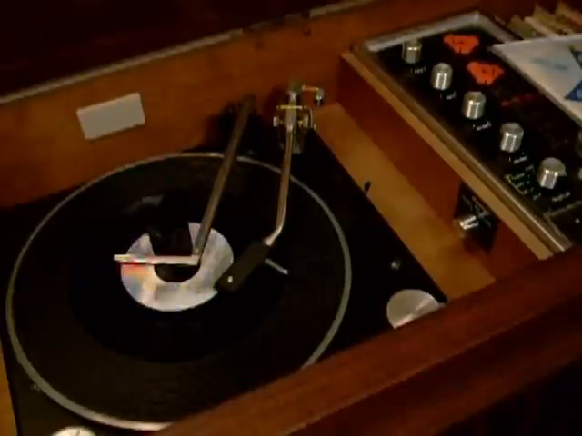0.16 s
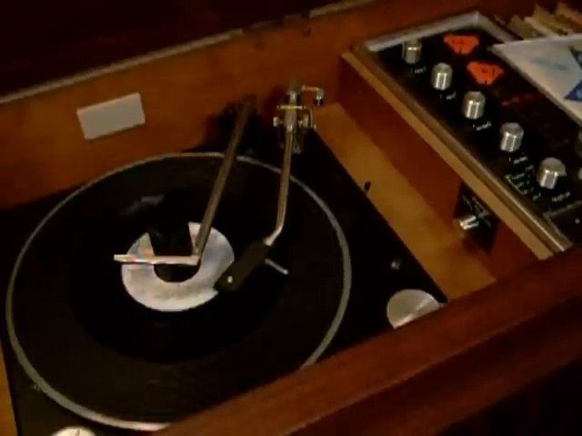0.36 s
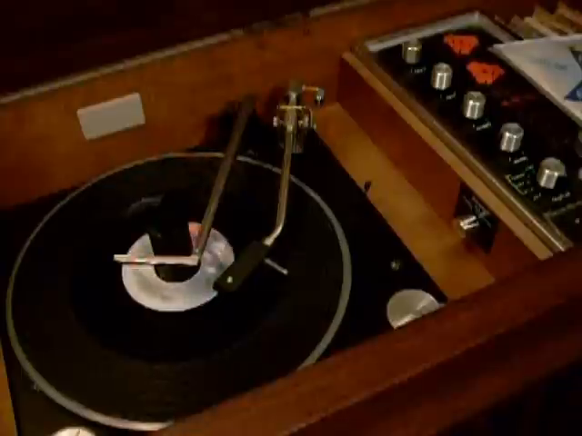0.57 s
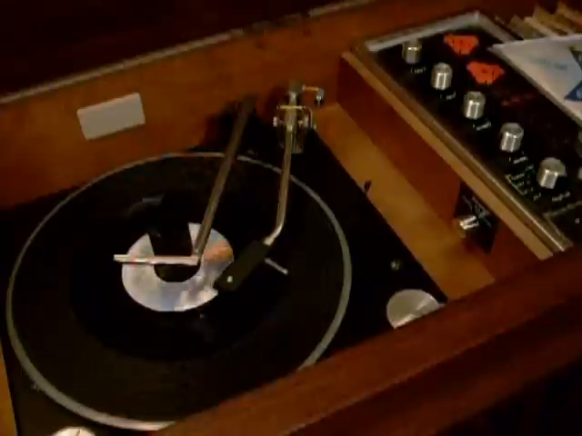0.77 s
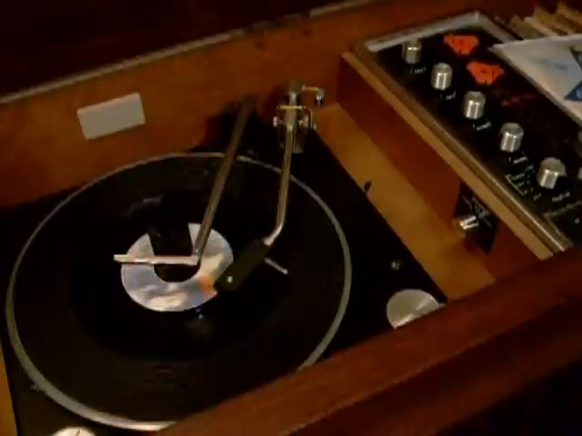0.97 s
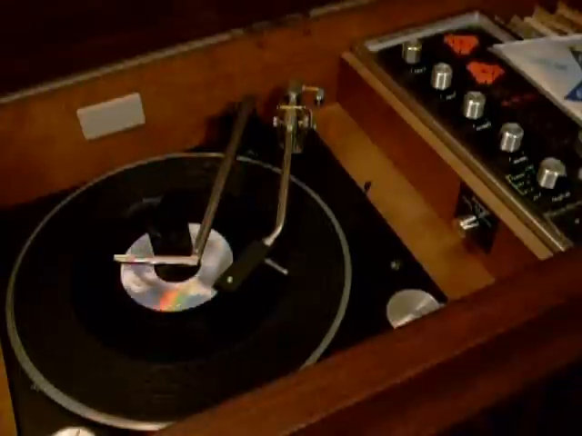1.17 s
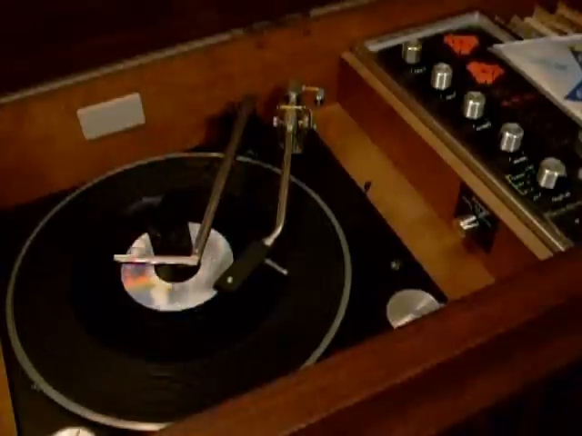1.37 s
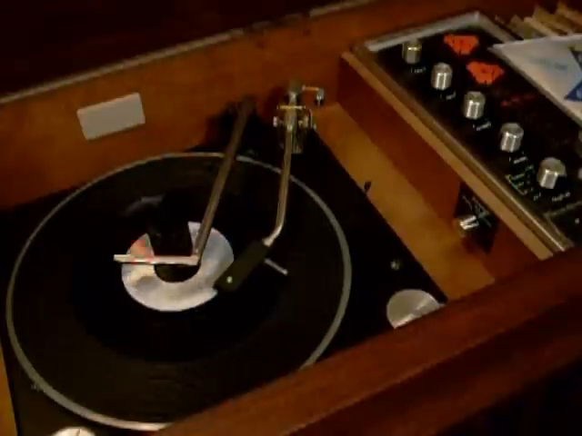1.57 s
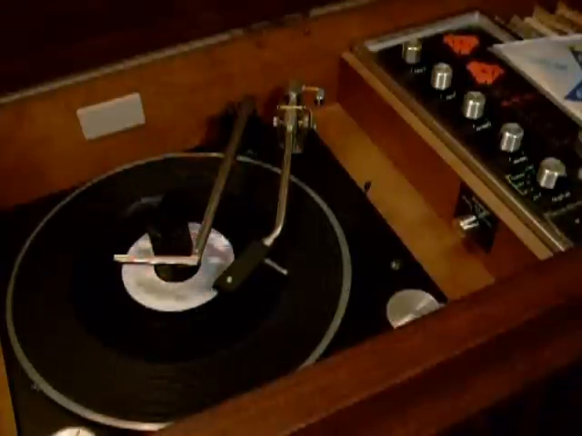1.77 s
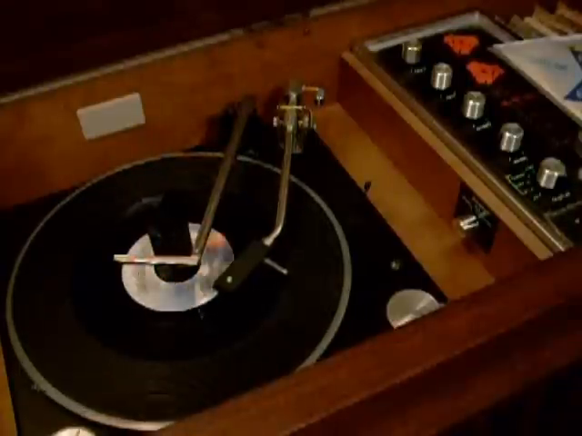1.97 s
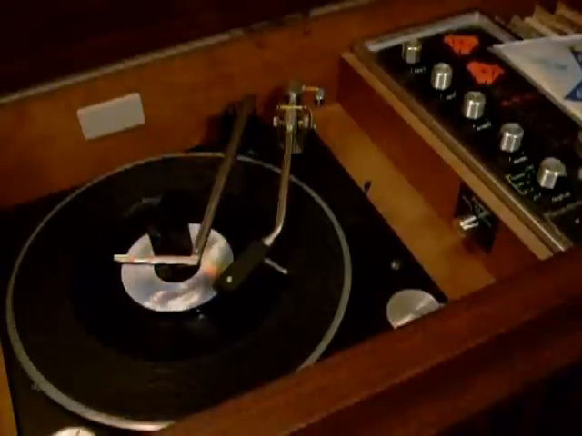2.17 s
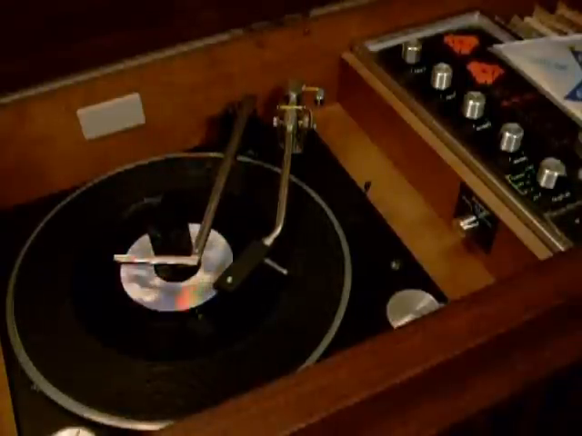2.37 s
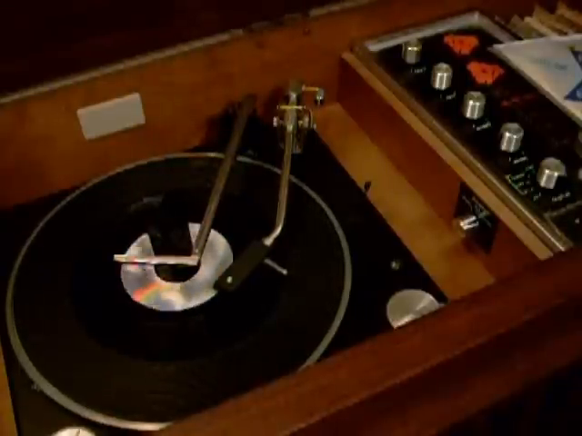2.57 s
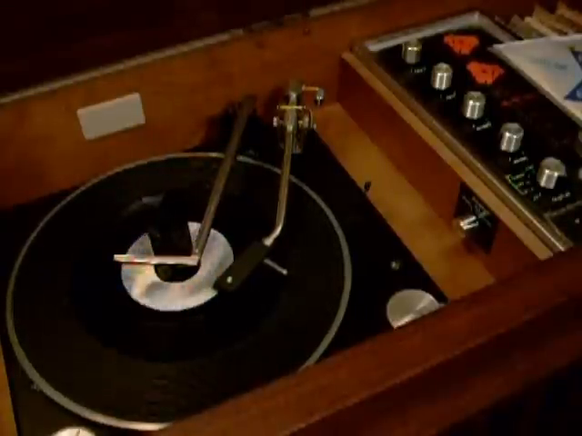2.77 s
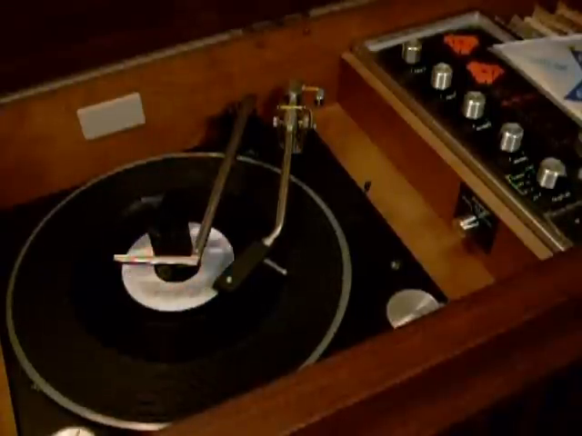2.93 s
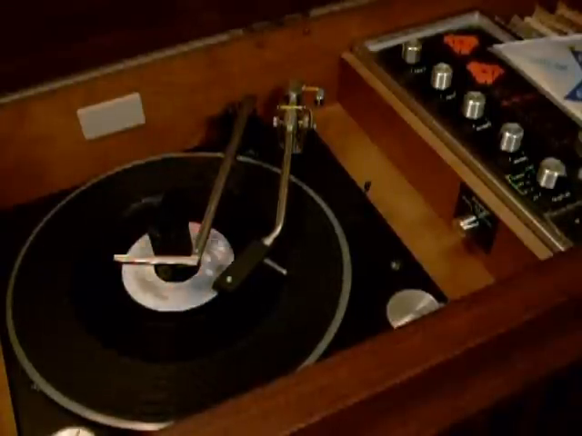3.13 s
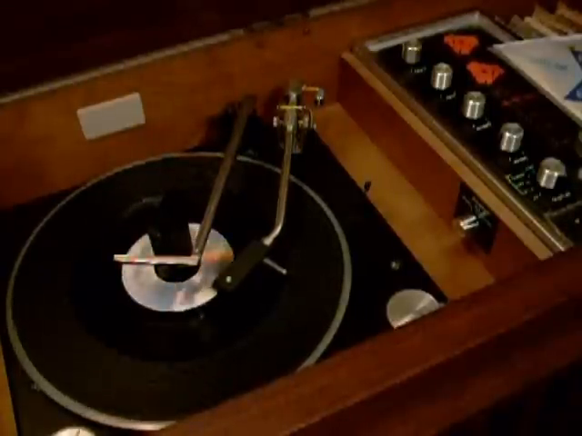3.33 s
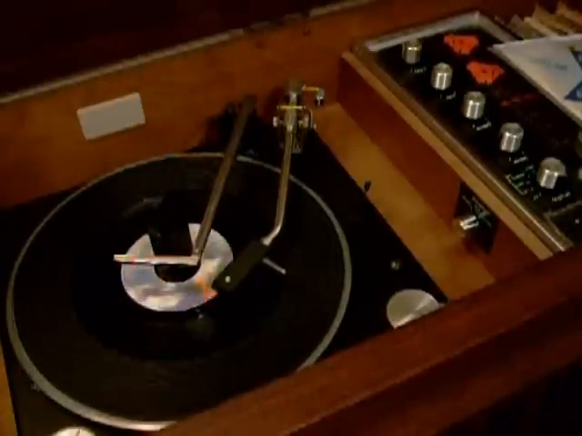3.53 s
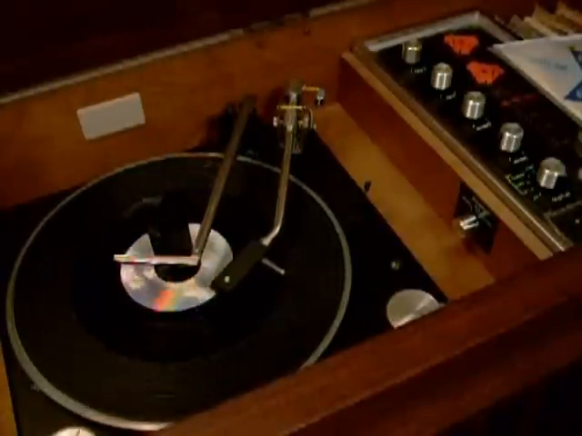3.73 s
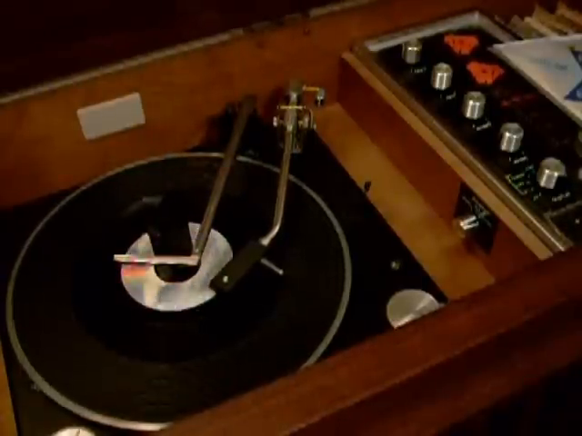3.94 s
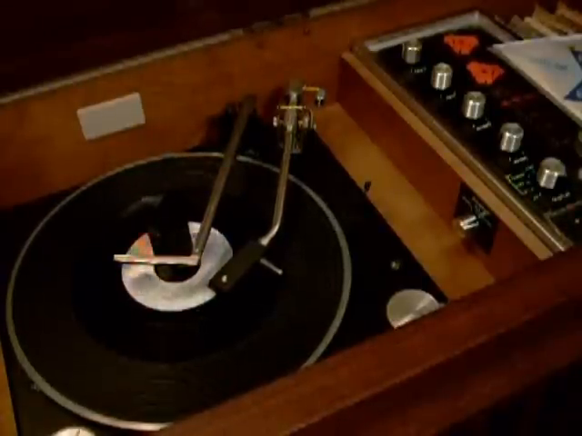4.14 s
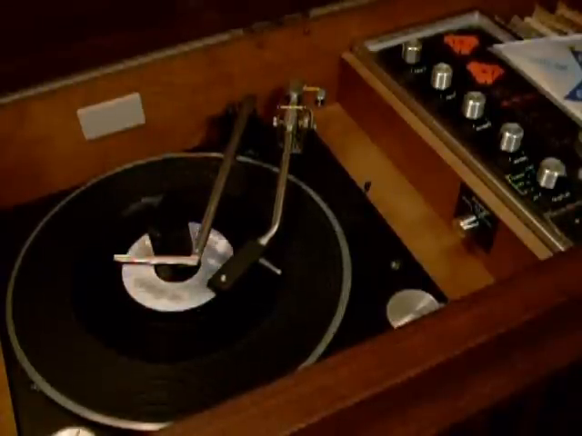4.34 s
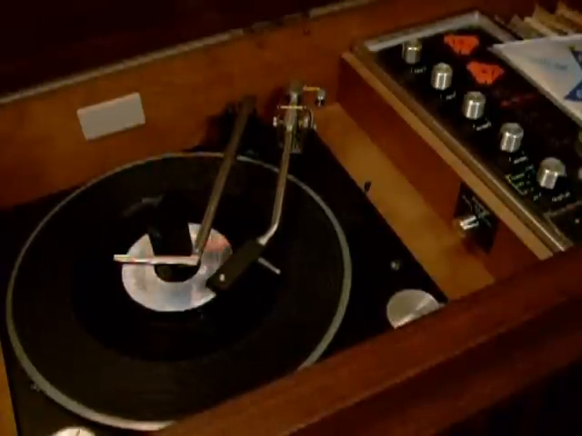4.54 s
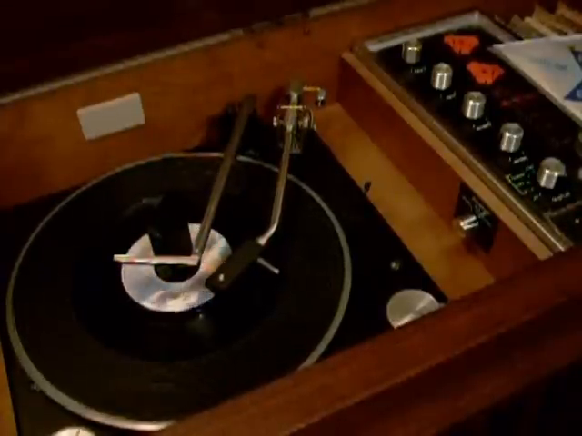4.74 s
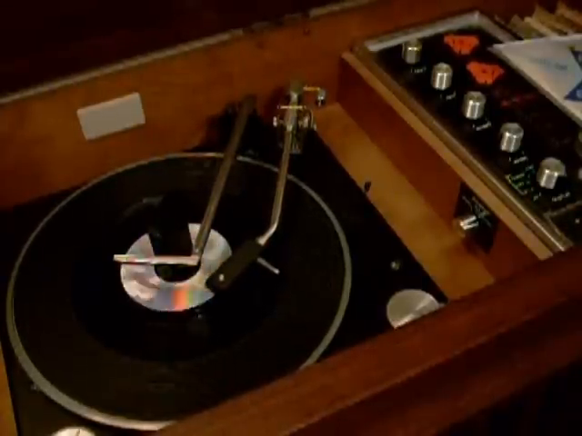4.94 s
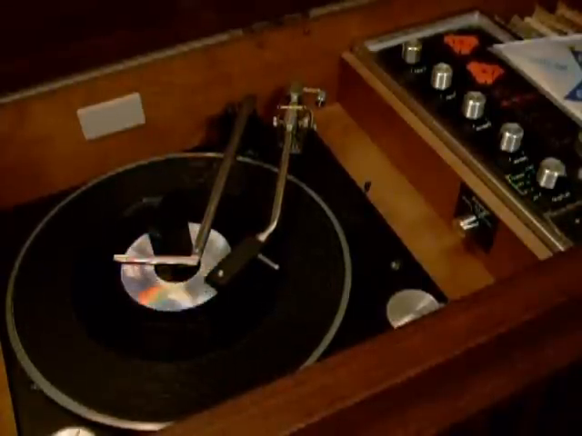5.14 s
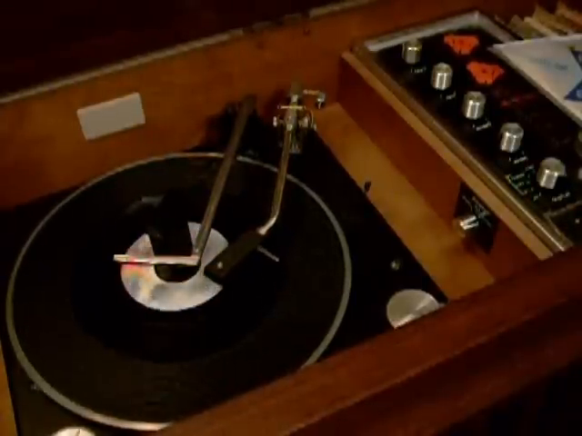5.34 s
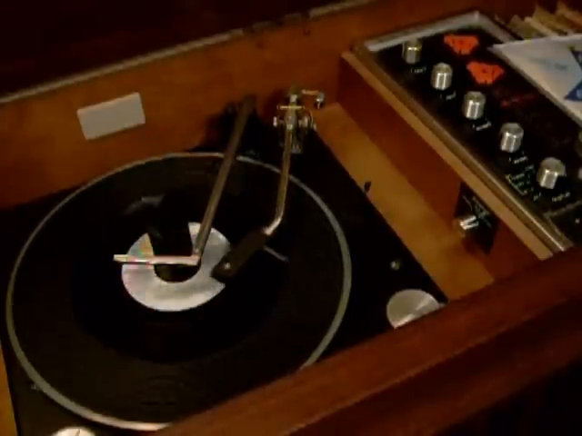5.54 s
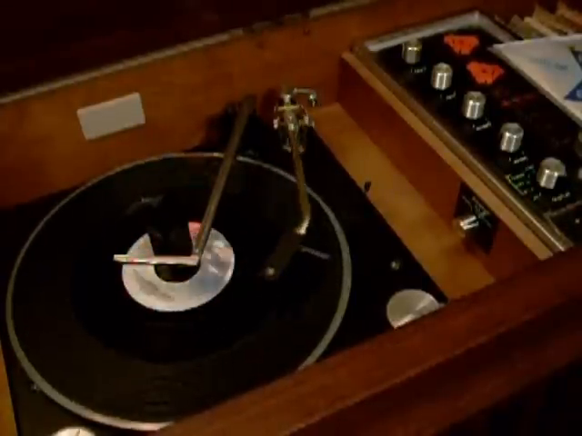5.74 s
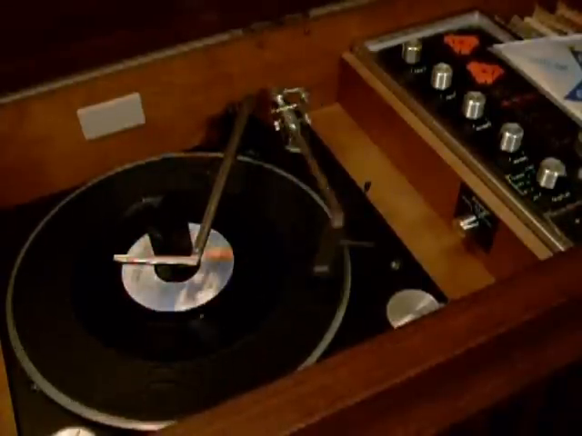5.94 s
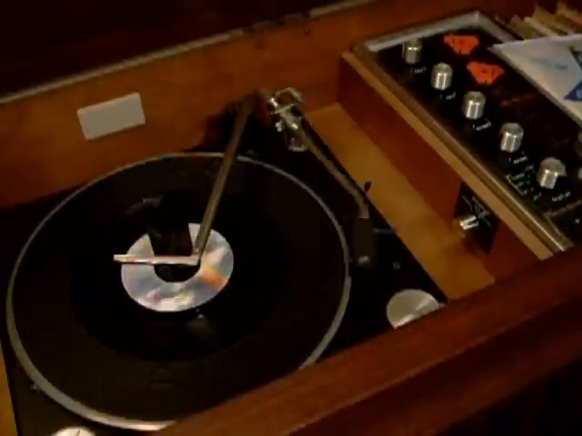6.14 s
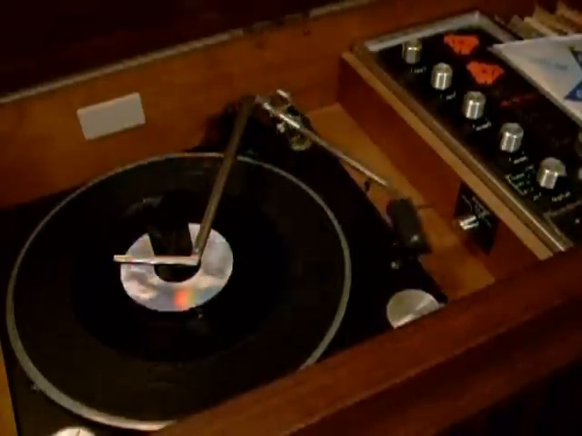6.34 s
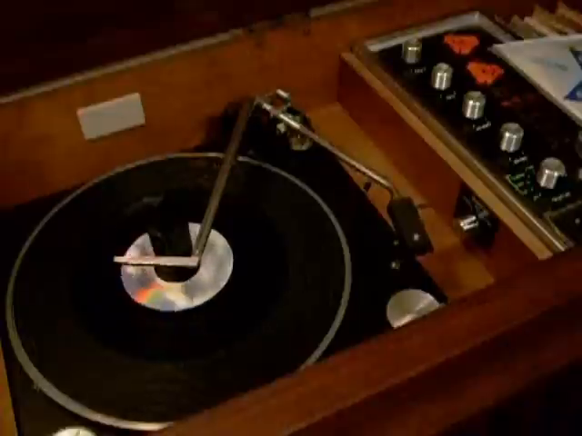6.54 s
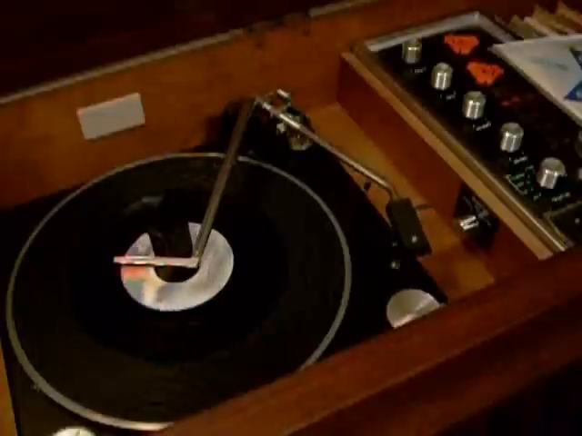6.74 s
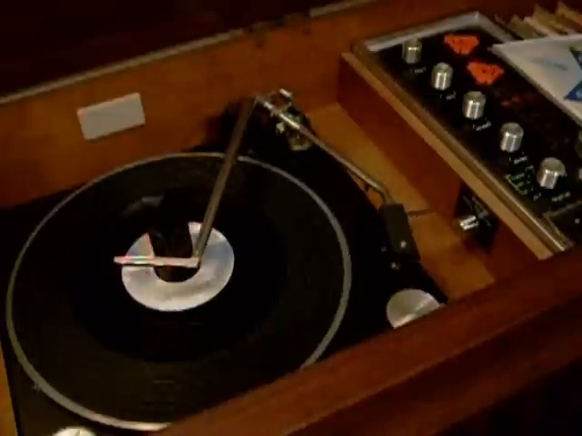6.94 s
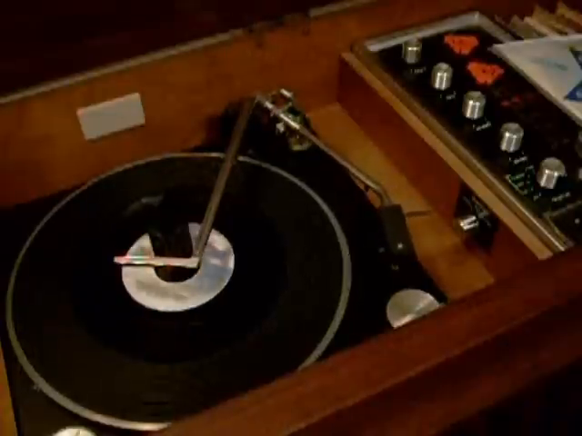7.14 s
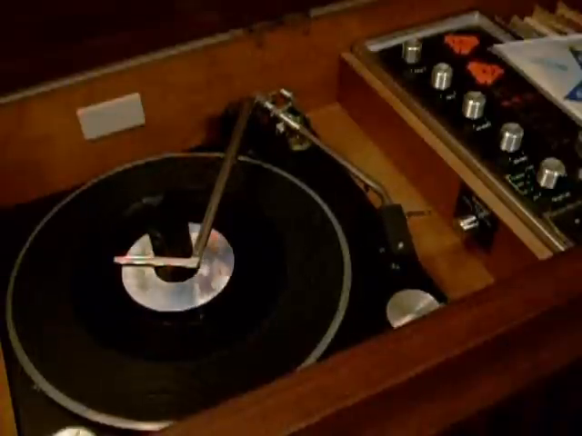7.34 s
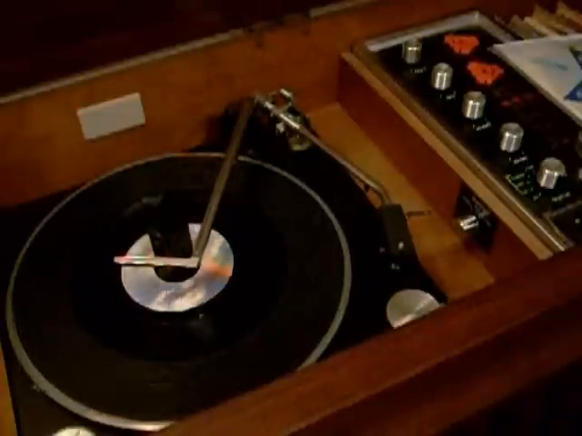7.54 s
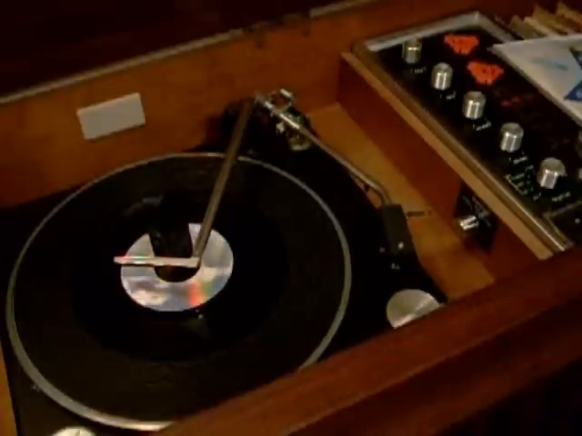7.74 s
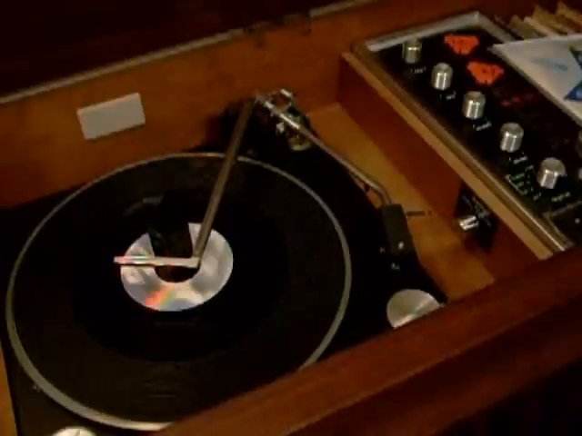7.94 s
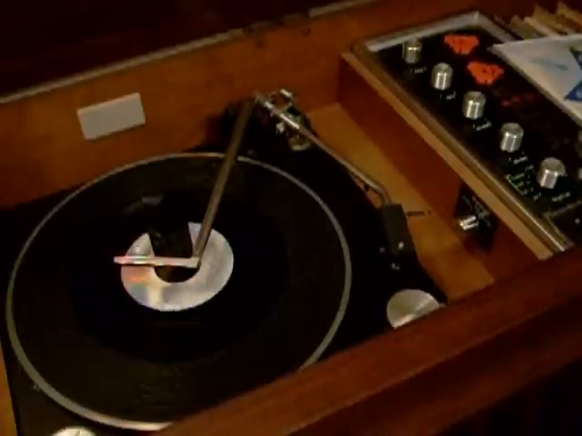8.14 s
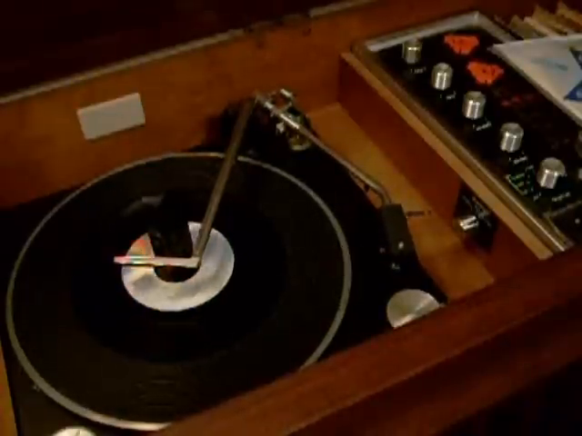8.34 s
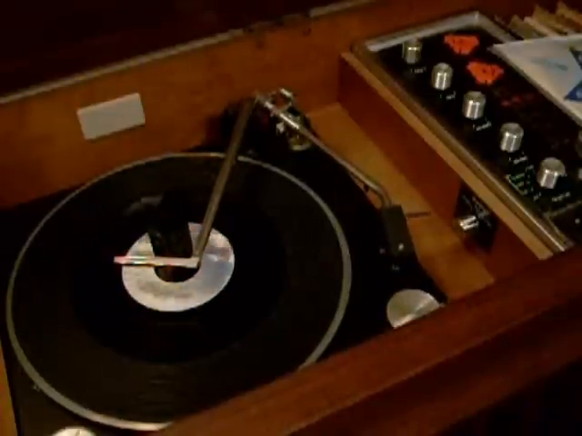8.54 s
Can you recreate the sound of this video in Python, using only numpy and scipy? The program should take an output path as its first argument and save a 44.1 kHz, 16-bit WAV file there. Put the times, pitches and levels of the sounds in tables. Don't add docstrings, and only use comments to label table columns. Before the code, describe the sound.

Vinyl hiss, motor hum and deep rumble build to a loud click and sharp pop, followed by small mechanical ticks and a wooden-metallic clatter, then hiss.

```python
import sys
import numpy as np
from scipy import signal
from scipy.fft import rfft, irfft
from scipy.io import wavfile
from scipy.ndimage import uniform_filter1d

SR = 44100
rng = np.random.default_rng(int(sys.argv[2]) if len(sys.argv) > 2 else 0)


def voltage_ratio(level):
    return 10 ** (np.asarray(level, float) / 20)


def output_pcm(signal):
    pcm = np.clip(np.atleast_2d(signal).T, -1, 1) * 32767
    wavfile.write(sys.argv[1], SR, np.round(pcm).astype(np.int16))


N = 379348

# (time [s], arm pitch [Hz], rise of the boom [dB])
ARM_PULL = [(2.75, 54.8, 1.5), (3.25, 45.1, 7.5), (3.6, 38.5, 10.5), (3.77, 44.78, 11.5), (4.15, 35.7, 13),
            (4.4, 35.54, 15.5), (4.55, 31.43, 19), (4.88, 33.3, 8.5), (5.0, 33.6, -3)]
# (time [s], swell or dip of the boom [dB])
LURCHES = [(0.05, 5), (0.53, 7), (0.85, -6), (1.3, 4), (1.93, 15), (2.08, -7), (2.47, 4), (2.58, -8),
           (2.84, 6.5), (2.97, 1.5), (3.33, 6.5), (3.37, -9), (3.74, -9), (3.83, 2), (3.93, -7), (4.02, 6),
           (4.29, -17), (4.48, 0.5), (4.64, 7), (4.93, 16.5), (5.04, -14), (6.36, 6), (6.78, 2), (6.93, 5),
           (7.78, 12), (8.25, 3), (8.41, 5)]
# (frequency [Hz], density [dB per Hz])
BOOM_SPECTRUM = [(20, -16), (30, 4), (45, 2.5), (60, -7), (90, -27.5), (130, -40.5)]
# (time [s], peak [dB], pitch [Hz], t60 [s])
THUMPS = [(1.63, -23, 39.3, 0.19), (1.9, -17, 45.4, 0.11), (4.446, -18.5, 171, 0.072),
          (4.453, -11.5, 90, 0.066), (4.44, -24, 120, 0.12), (4.468, -17, 54, 0.2), (4.46, -38, 700, 0.03),
          (4.456, -32.5, 303, 0.1), (4.457, -33, 521, 0.023), (4.56, -27, 98, 0.047),
          (4.91, -8.5, 48, 0.13), (4.917, -26.5, 205, 0.025), (4.568, -28, 198, 0.032),
          (6.105, -24.5, 700, 0.05), (6.105, -27.5, 172, 0.036), (6.105, -34, 477, 0.041),
          (6.2, -29, 574, 0.033)]
# (time [s], level [dB], top [Hz], t60 [s])
SHUDDERS = [
    (4.449, -27, 460, 0.2),
    (4.555, -32, 296, 0.15),
    (4.915, -35, 498, 0.1),
]
# (time [s], peak [dB], favoured low mode [Hz], middle modes [dB], upper modes [dB])
CAM_TICKS = [(4.918, -38, 490, -15, -21), (4.937, -38.5, 800, -3, -11), (4.962, -36, 666, -15, -13),
             (5.347, -35, 852, -8, -9), (5.474, -35, 696, -6.5, -19), (5.611, -37, 480, -12, -17),
             (5.726, -33.5, 1103, -1.5, -2.5), (5.812, -37.5, 670, -8, -5), (5.822, -33.5, 675, -7.5, -3),
             (5.916, -46, 552, -12, -13), (6.662, -41, 640, -11, -16), (6.719, -46, 692, -12, -16),
             (6.774, -34, 730, -5, -4), (6.798, -38.5, 1060, -4, -2), (6.899, -39, 690, -15, -15)]
# (time [s], peak [dB], favoured low mode [Hz], middle modes [dB], upper modes [dB])
REST_CLATTER = [(5.992, -28.5, 816, -6, -7), (6.011, -43, 870, -12, -10), (6.062, -38, 650, -12, 0.1),
                (6.074, -25, 930, -5.5, -6.5), (6.106, -19.5, 477, -8, -6.5), (6.123, -29.5, 525, -6, -23),
                (6.152, -37, 630, -8, -5), (6.164, -32.5, 441, -5, -4), (6.171, -29.5, 1040, -10, -6),
                (6.194, -23.5, 870, -1.5, -8), (6.222, -28, 653, -4, 0.5), (6.234, -32.5, 965, -6, -10),
                (6.258, -35, 650, -12, -7.5), (6.271, -36, 1050, -14, -24), (6.306, -38.5, 780, -6.5, -7),
                (6.325, -42, 860, -14, -18)]
# (frequency [Hz], level [dB], t60 [s])
LOW_MODES = [(289, 1.5, 0.054), (380, -8, 0.11), (492, 2, 0.033), (555, 1, 0.033), (686, 3.5, 0.046),
             (817, -3, 0.069), (884, 1.5, 0.08), (1022, 2, 0.055), (1060, 0, 0.048), (1335, -25, 0.011)]
# (frequency [Hz], level [dB], t60 [s])
MIDDLE_MODES = [(1655, -6.5, 0.023), (1780, -1.5, 0.04), (1900, -2.5, 0.026), (1984, 1.5, 0.031),
                (2056, 1.5, 0.045), (2226, 1, 0.048)]
# (frequency [Hz], level [dB], t60 [s])
UPPER_MODES = [(2720, -20, 0.016), (3165, 2.5, 0.021), (3310, 1, 0.016), (3360, 4.5, 0.019),
               (3560, 0, 0.015), (3810, -4, 0.018), (4200, -3, 0.018), (3996, -1, 0.022)]
# (time [s], peak [dB], lowest pitch [Hz], highest pitch [Hz])
DUST_TICKS = [
    (3.14, -13, 1500, 12000),
    (4.4147, -6, 700, 8400),
    (4.4239, -10.5, 2500, 7480),
    (4.8085, -20.5, 3002, 11000),
    (6.1067, -6, 9600, 11000),
]
# (time [s], level [dB])
GROOVE_WEAR = [(0.0, -52.5), (1.25, -53), (1.65, -51), (1.95, -53.5), (2.45, -56), (3.35, -54.5),
               (3.55, -53), (4.75, -54.5), (5.1, -55.5), (6.65, -55.5), (7.4, -55), (7.75, -53.5),
               (8.6, -54)]
# (time [s], extra roughness [dB])
SCUFFS = [(0.03, 1.5), (0.3, 1), (0.6, 1.5), (0.92, 0.5), (1.62, 1), (1.85, 1.5), (2.72, 2), (3.88, 3),
          (4.8, 1), (5.21, 2.5), (6.4, 1.5), (7.7, 1.5), (8.04, 1)]
# (frequency [Hz], density [dB per Hz])
HISS_SPECTRUM = [(150, -27), (250, -3), (840, -6), (1700, -8.5), (5000, -13.5), (12500, -18),
                 (15500, -19.5)]
# (frequency [Hz], density [dB per Hz])
RUMBLE_SPECTRUM = [(32, -29), (55, 3.5), (97, -4), (156, -10.5), (280, -19), (500, -29), (650, -32.5),
                   (1100, -120)]
# (frequency [Hz], density [dB per Hz])
WARP_SPECTRUM = [(4, 4.5), (8, -3), (14, -3.5), (26, -6), (36, -39)]
# (multiple of the hum pitch [1], level [dB])
HUM_LINES = [(.5, -15), (1, 1.5), (2, -9.5), (3, -19)]
# (time [s], dip [dB])
HUM_GAPS = [
    (0.62, -7),
    (1.6, -8.5),
    (2.41, -2.5),
    (3.61, -8),
    (4.09, -15),
]

LURCH_S, SCUFF_S = 0.027, 0.044
POP_S, POP_DB, STEP_DB, BOUNCE_DB = 4.65154, -6, -8, -22


def rms_one(x):
    return x / np.sqrt(np.mean(x ** 2) + 1e-20)


def in_time(rows):
    s, *columns = np.transpose(rows)
    return [np.interp(np.arange(N) / SR, s, c) for c in columns]


def bumps(rows, width_s):
    t = np.arange(0, N, 20) / SR
    swells = sum(db * np.exp(-((t - s) / width_s) ** 2) for s, db in rows)
    return np.interp(np.arange(N) / SR, t, swells)


def drift(rate_hz):
    r = np.exp(-80 * np.pi * rate_hz / SR)
    slow = signal.lfilter([1], [1, -2 * r, r * r], rng.standard_normal(N // 40 + 2002))[2000:]
    return np.interp(np.arange(N) / 40, np.arange(len(slow)), rms_one(slow))


def coloured(spectrum, top_hz):
    hz = np.maximum(np.fft.rfftfreq(N, 1 / SR), 1)
    point_hz, point_db = np.transpose(spectrum)
    shape = voltage_ratio(np.interp(np.log(hz), np.log(point_hz), point_db)) * (hz < top_hz)
    return rms_one(irfft(rfft(rng.standard_normal(N)) * shape, N))


def evened(noise, size):
    return rms_one(noise / uniform_filter1d(noise ** 2, size=size) ** 0.35)


def ring(clicks, hz, t60):
    r, w = voltage_ratio(-60 / (t60 * SR)), 2 * np.pi * hz / SR
    return signal.lfilter([0, np.sin(w)], [1, -2 * r * np.cos(w), r * r], clicks + 1e-18)


def add(out, s, sound):
    start = round(s * SR)
    out[start:start + len(sound)] += sound


def roughness():
    return in_time(GROOVE_WEAR)[0] + bumps(SCUFFS, SCUFF_S)


def boom():
    t, rough_db = np.arange(N) / SR, roughness()
    arm_hz, pull_db = in_time(ARM_PULL)
    wander_db = 2.5 * drift(7.2) * np.interp(t, [3, 3.3, 5, 5.1], [1, 0.3, 0.3, 1])
    level_db = -34.5 + 0.1 * (rough_db - rough_db.mean()) + pull_db + bumps(LURCHES, LURCH_S) + wander_db
    broad = evened(coloured(BOOM_SPECTRUM, top_hz=240), size=4000)
    phase = 2 * np.pi * np.cumsum(arm_hz + 3 * drift(14.8)) / SR
    higher_mode = 0.38 * np.sin(1.3 * phase + 1.03 * drift(5.0))
    swing = np.sqrt(2) * (np.sin(phase) + higher_mode)
    share = np.interp(t, [3.1, 3.5, 4.85, 4.9], [0.014, 0.63, 0.64, 0.025])
    pop_dip = 1 - np.exp(-((t - POP_S) / 0.012) ** 2)
    return pop_dip * voltage_ratio(level_db - 1.36) * (np.sqrt(share) * swing + np.sqrt(1 - share) * broad)


def thumps():
    out = np.zeros(N)
    for s, db, hz, t60 in THUMPS:
        age = np.arange(round(2 * t60 * SR)) / SR
        swell = age * voltage_ratio(-90 * age / t60)
        add(out, s, -voltage_ratio(db) * swell / swell.max() * np.sin(2 * np.pi * hz * age))
    return out


def shudders():
    out, age = np.zeros(N), np.arange(16000) / SR
    for s, db, top_hz, t60 in SHUDDERS:
        band = signal.butter(4, [70, top_hz], "band", fs=SR, output="sos")
        noise = rms_one(signal.sosfilt(band, rng.standard_normal(len(age))))
        onset = 1 - np.exp(-age / 0.0076)
        add(out, s, voltage_ratio(db - 60 * age / t60) * onset * noise)
    return out


def struck_modes(modes, rattle):
    favoured_hz = modes[-1][0]
    body = 0
    for k, (hz, db, t60) in enumerate(modes):
        strength_db = db + rng.normal(0, 2.2) - 3.2 * abs(np.log2(hz / favoured_hz))
        body = body + voltage_ratio(strength_db) * rms_one(ring(rattle, hz, t60)) * (-1) ** k
    return body / np.abs(body).max()


def knocks():
    out, age = np.zeros(N), np.arange(6000) / SR
    for s, db, low_hz, middle_db, upper_db in [*CAM_TICKS, *REST_CLATTER]:
        middle_hz = np.interp(db, [-40, -20], [2220, 1988]) + 70 * rng.standard_normal()
        groups = (([*LOW_MODES, (low_hz, 3, 0.045)], 0),
                  ([*MIDDLE_MODES, (middle_hz, 3, 0.045)], middle_db),
                  (UPPER_MODES, upper_db))
        for modes, group_db in groups:
            sizes = rng.random(len(age))
            contacts = np.roll(sizes, 1) < 3000 / SR
            rattle = contacts * (sizes - 0.5) * 2 * np.exp(-age / 0.0032)
            rattle[0] = 0.87
            add(out, s, voltage_ratio(db + group_db) * struck_modes(modes, rattle))
    return signal.sosfilt(signal.butter(6, 4700, fs=SR, output="sos"), out)


def big_pop(out):
    age = np.arange(2000) / SR
    rise = np.clip(age / 0.00021, 0, 1) ** 2.2
    add(out, POP_S, -voltage_ratio(POP_DB) * rise * np.exp(-np.maximum(age - 2.2e-4, 0) / 1.6e-5))
    add(out, POP_S + 3.0e-4, -voltage_ratio(BOUNCE_DB) * np.exp(-age / 2e-5))
    jump = np.cos(2 * np.pi * 95 * age) * np.exp(-age / 0.0072) * rise
    fade = np.cos(np.linspace(0, np.pi / 2, len(age)))
    add(out, POP_S, -voltage_ratio(STEP_DB) * jump * fade)


def ticks():
    out, click = np.zeros(N), signal.unit_impulse(2000)
    for s, db, low_hz, high_hz in DUST_TICKS:
        edges_hz = [low_hz, np.clip(high_hz, 1.1 * low_hz, 18000)]
        band = signal.butter(3, edges_hz, "band", fs=SR, output="sos")
        add(out, s, voltage_ratio(db) * signal.sosfilt(band, click))
    big_pop(out)
    out = signal.lfilter(*signal.iirnotch(9000, 4.0, fs=SR), out)
    return signal.sosfilt(signal.cheby2(8, 50, 1.04 * 16500, fs=SR, output="sos"), out)


def warp():
    lurch_db = np.clip(bumps(LURCHES, 2 * LURCH_S), -9, 9)
    level_db = -31.5 + 2.5 * drift(4.9) + 0.31 * lurch_db
    return voltage_ratio(level_db + 0.46) * evened(coloured(WARP_SPECTRUM, top_hz=53), size=9000)


def rumble():
    rough_db = roughness()
    level_db = -42.5 + 0.79 * (rough_db - rough_db.mean()) + 0.8 * drift(4.2)
    level_db = level_db - 0.9 * (np.arange(N) / SR > 5)
    return voltage_ratio(level_db + 1.8 + drift(11)) * evened(coloured(RUMBLE_SPECTRUM, top_hz=1000), size=5000)


def hiss():
    flicker_db = 0.7 * drift(23) + 0.5 * drift(105)
    return voltage_ratio(roughness() + 5.5 + flicker_db) * coloured(HISS_SPECTRUM, top_hz=15560)


def hum():
    t = np.arange(N) / SR
    phase = 2 * np.pi * np.cumsum(120 + 0.367 * drift(2.54)) / SR
    sag_db = 5 * np.maximum(t - 3.3, 0)
    lines = 0
    for k, db in HUM_LINES:
        lines = lines + voltage_ratio(db + 0.79 * drift(9.2) - sag_db / k ** 2) * np.sin(k * phase)
    level_db = -45 + 1.06 * drift(1.5) + bumps(HUM_GAPS, 0.041)
    fading = np.interp(t, [4.4, 4.7], [1, 0])
    return np.sqrt(2) * voltage_ratio(level_db) * fading * lines


def scene():
    arm_and_deck = boom() + thumps() + shudders() + knocks()
    groove_and_motor = ticks() + warp() + rumble() + hiss() + hum()
    return (arm_and_deck + groove_and_motor)[None]


def roll_off(x):
    return signal.sosfilt(signal.butter(12, 16520, fs=SR, output="sos"), x)


def record(dry):
    return roll_off(dry)


dry = scene()
out = record(dry)
output_pcm(out)
```